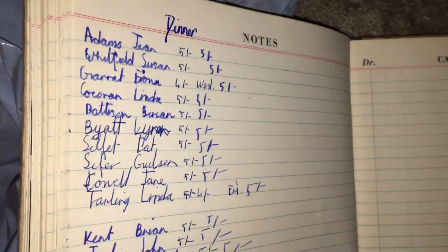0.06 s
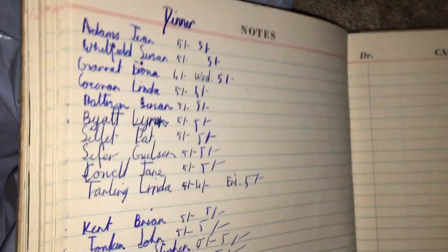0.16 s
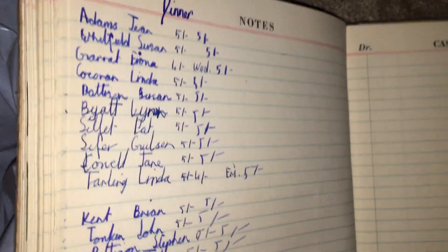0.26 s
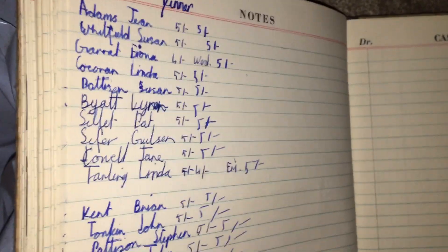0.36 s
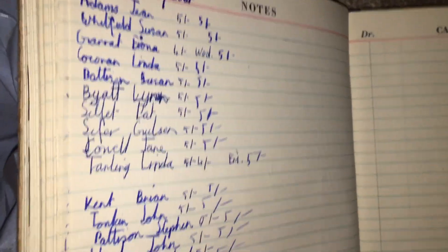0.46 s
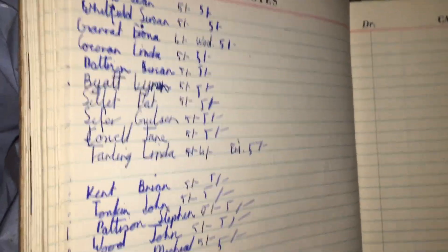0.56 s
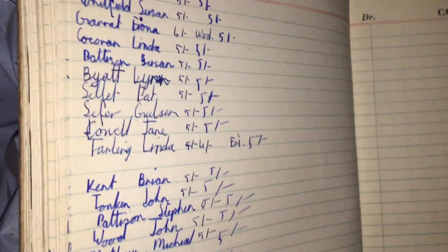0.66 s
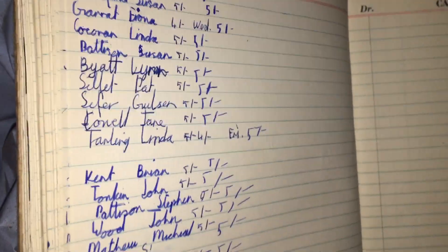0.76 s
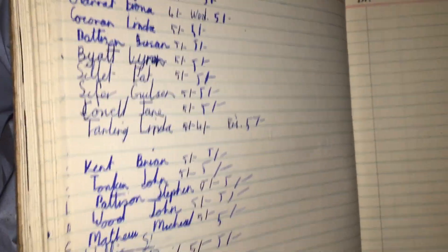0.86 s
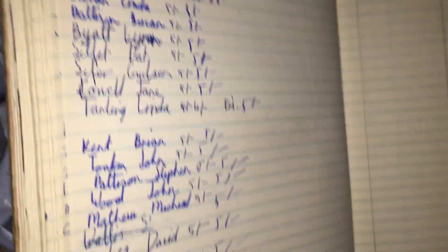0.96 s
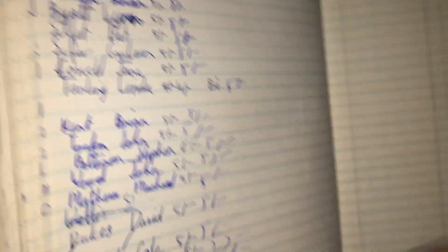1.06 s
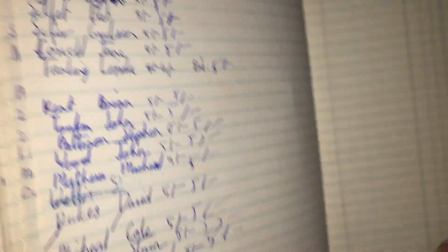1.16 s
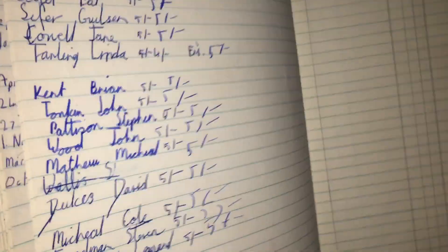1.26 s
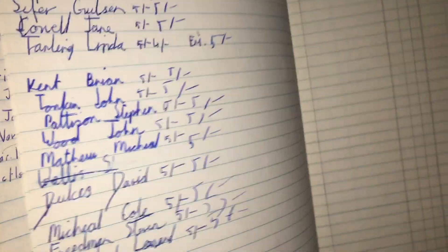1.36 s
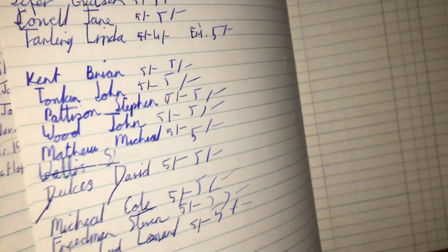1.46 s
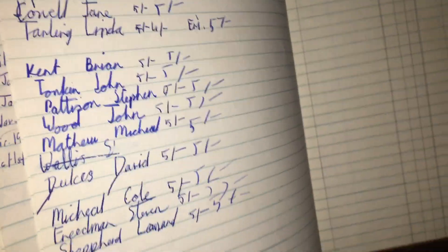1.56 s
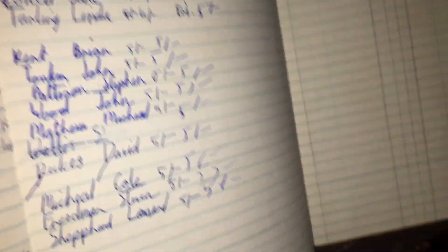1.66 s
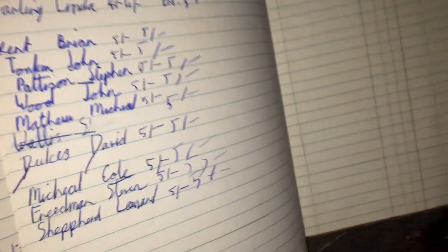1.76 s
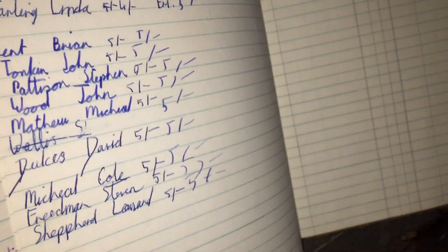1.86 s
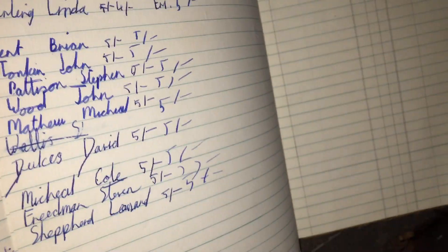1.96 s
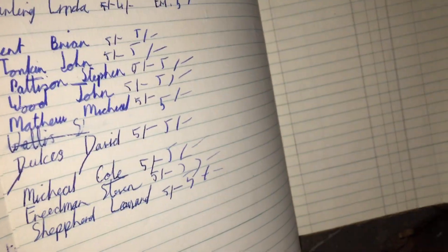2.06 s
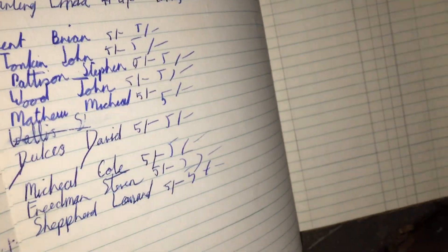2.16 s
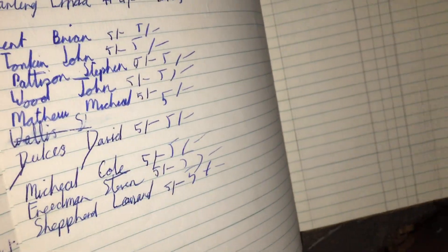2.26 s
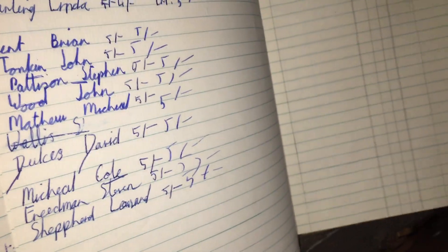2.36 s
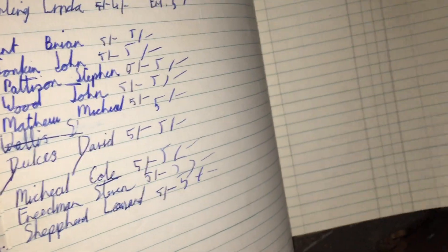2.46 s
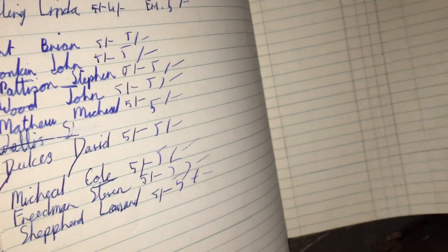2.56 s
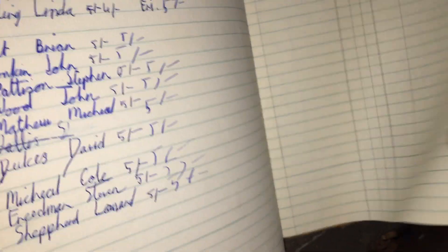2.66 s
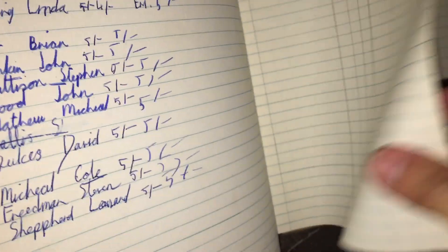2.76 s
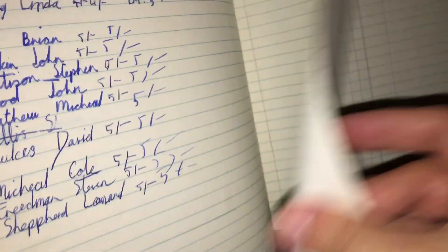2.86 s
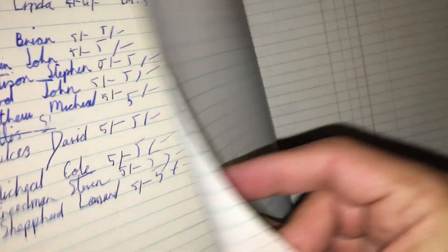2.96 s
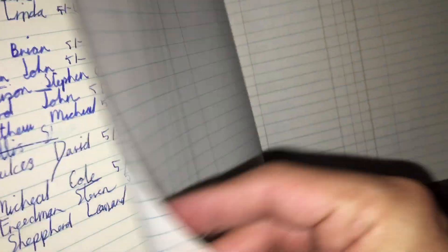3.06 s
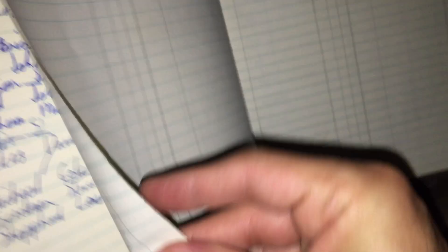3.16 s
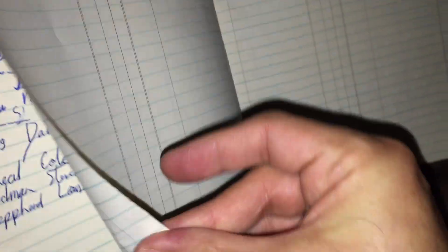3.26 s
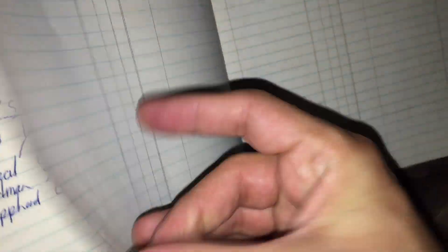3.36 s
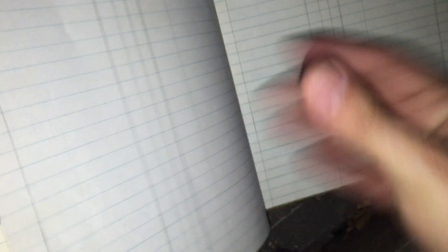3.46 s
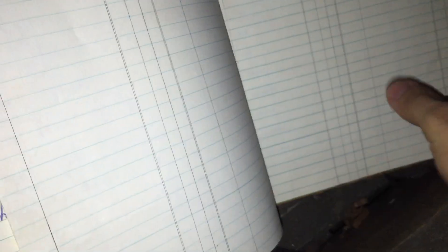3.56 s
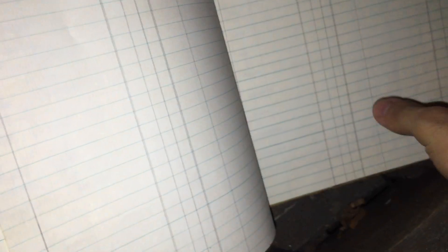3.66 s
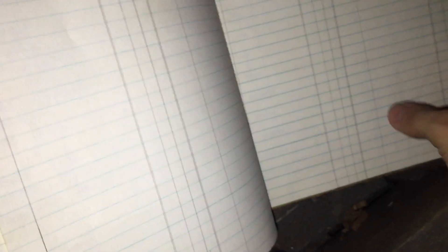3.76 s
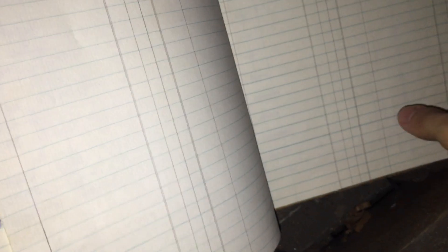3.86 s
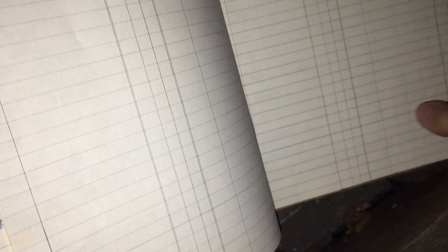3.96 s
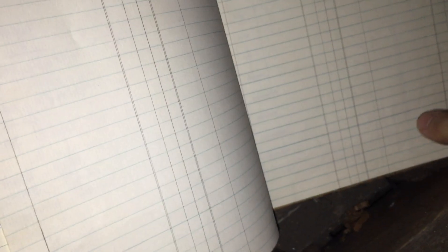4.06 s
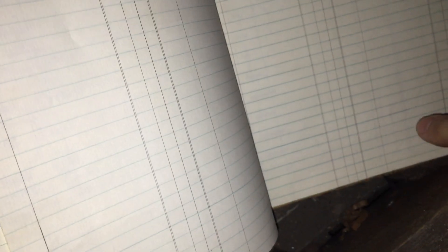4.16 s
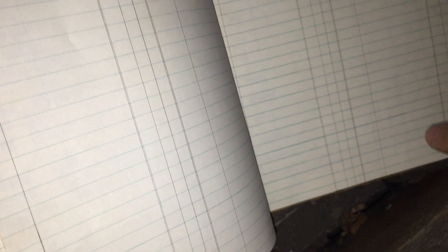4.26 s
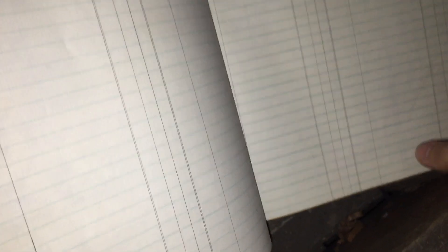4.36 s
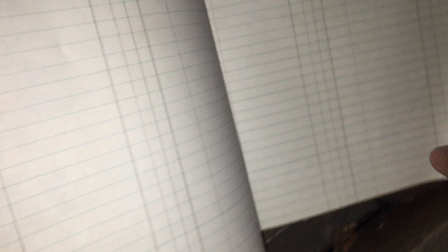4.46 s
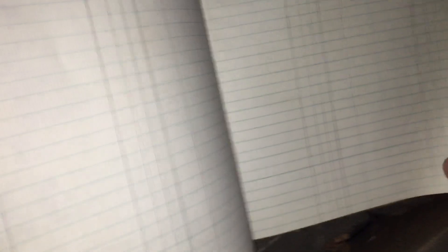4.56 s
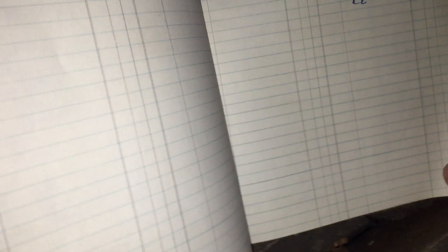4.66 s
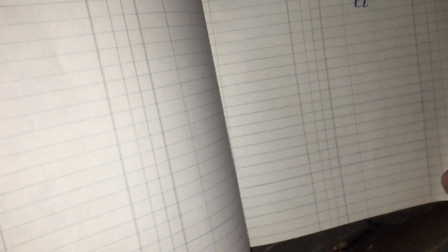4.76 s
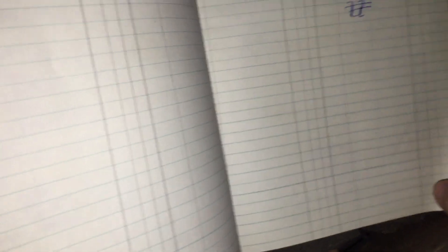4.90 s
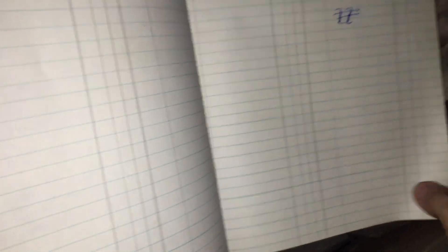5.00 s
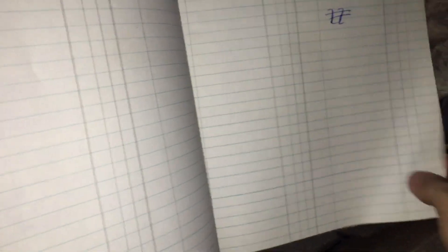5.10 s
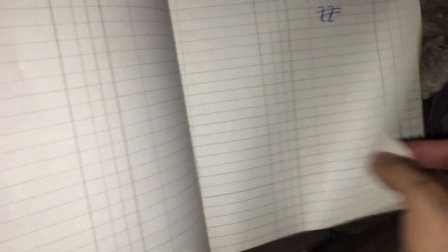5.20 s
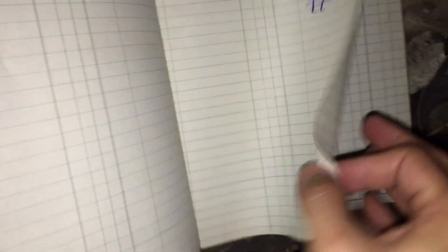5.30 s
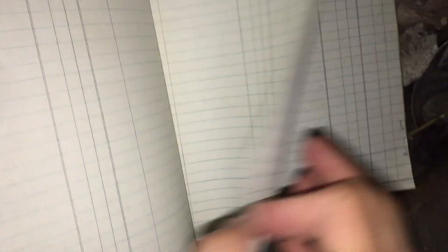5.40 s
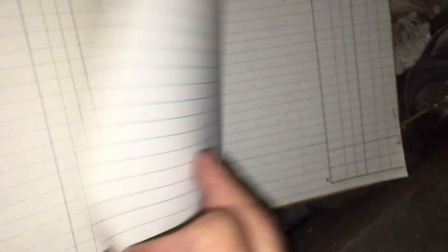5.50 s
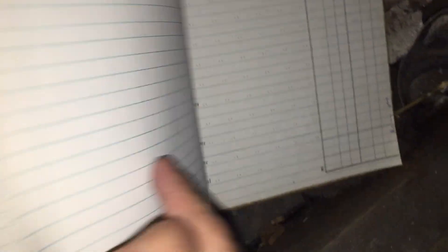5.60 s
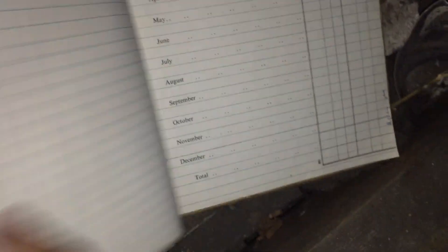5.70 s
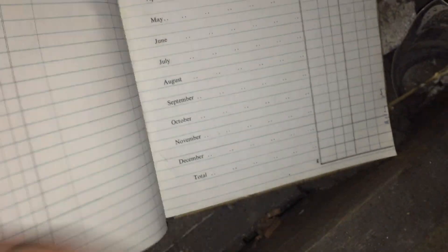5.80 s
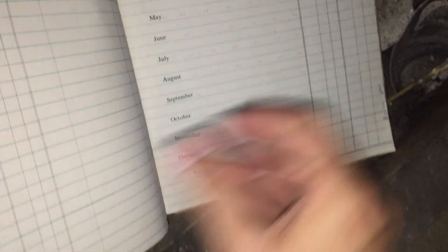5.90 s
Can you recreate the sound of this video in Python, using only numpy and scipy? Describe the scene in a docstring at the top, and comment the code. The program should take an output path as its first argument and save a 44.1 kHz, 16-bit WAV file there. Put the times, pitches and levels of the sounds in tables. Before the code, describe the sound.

A quiet indoor room, dry and close, with a very faint steady hiss and an uneven low rumble from the hand holding the microphone. From 0 to 2 s there is little else: soft dull bumps around 0.4, 1.1 and 1.4 s and barely audible paper ticks. At about 2.04 s a crisp crackle and scrape, a low thump at 2.17, then a raspy fingertip swipe from 2.3 to 2.55 s. A bump and paper flick at 2.7 s lead into a fuller page turn, bending and rustling from 3.0 to 3.5 s, ending in a small snap. Then near stillness with tiny ticks until a sharp bright crack at 4.54 s. Light touches follow; a second turn rustles from 5.2 to 5.6 s with a snap at 5.35. The loudest burst, hard bright crackling, comes at 5.8 to 5.85 s and fades quickly.

```python
"""Leafing through a thick diary

A quiet room, a hand-held microphone close to a thick diary: a hand flicks through its dry pages.
Sliding, bending and scraping paper is random fibre slips ringing resonances; creases snap as short
ringing bursts, taut sheets crack as single swings, and soft bumps are low decaying cycles.
The grip on the recorder rumbles as lumpy low noise over faint steady hiss, with a short room tail."""
import sys
import numpy as np
from scipy import signal
from scipy.fft import rfft, irfft
from scipy.io import wavfile

SR = 44100
rng = np.random.default_rng(int(sys.argv[2]) if len(sys.argv) > 2 else 0)


def int16_out(signal):
    """Quantize to a 16-bit WAV file."""
    q = np.round(np.clip(np.atleast_2d(signal).T, -1, 1) * 32767)
    wavfile.write(sys.argv[1], SR, q.astype(np.int16))


def amplitude_ratio(level_db):
    """Convert a level in decibels to the matching linear amplitude (field) ratio."""
    exponent = np.asarray(level_db, float) / 20
    return 10 ** exponent


N = 261851   # length in samples

# steady hiss at the microphone, spectrum shape: f/Hz, relative level/dB
HISS_SPECTRUM = [(180, -67.5), (300, -2.5), (842, -8), (2320, -14), (4910, -17), (5610, -18), (15000, -23),
                 (16000, -54.5)]
HISS_DB = -72.5   # rms
# low rumble of the holding hand, spectrum shape: f/Hz, relative level/dB
RUMBLE_SPECTRUM = [(15, -49), (25, -24), (46, 4.5), (70, 4.5), (146, 0.5), (260, -11.5), (340, -24.5),
                   (570, -120)]
# tension of the holding hand: t/s, level/dB
GRIP_TENSION = [(0.0, -62), (0.12, -51), (0.2, -54.5), (0.38, -50), (0.51, -56.5), (0.71, -60), (1.39, -56),
                (1.58, -55), (1.95, -52.5), (2.21, -55), (2.38, -57.5), (3.32, -61.5), (3.43, -65.5),
                (3.66, -66.5), (3.96, -64), (4.16, -61.5), (5.24, -58), (5.81, -57.5), (5.93, -54)]
RUMBLE_DB, BODY_REST_DB = 0.5, -20.5   # rumble and resting book, over the grip
# the block of pages shifts under the hands: start t/s, rise/s, fall/s, level/dB
BLOCK_SHIFTS = [(0.7, 0.051, 0.038, -66), (0.99, 0.028, 0.21, -65.5), (1.4, 0.13, 0.028, -58),
                (1.74, 0.036, 0.035, -59), (2.03, 0.017, 0.26, -73), (2.712, 0.006, 0.035, -52),
                (3.06, 0.081, 0.095, -56.5), (5.24, 0.11, 0.082, -47.5), (5.76, 0.081, 0.15, -55)]
RUMBLE_SHIFT_DB = -8.5   # rumble that a shift of the block passes to the hand

# resonances of the book and of each paper layer: f/Hz, width/Hz, level/dB
BODY_MODES = [(236, 288, 1), (334, 82, 7.5), (370, 1000, -11.5)]
FLEX_MODES = [(737, 235, 1.5), (1210, 460, 0.5), (1560, 1160, -5.5), (2130, 910, -2.5)]
RUB_MODES = [(2580, 1810, -1.4), (3470, 1150, 1.3), (4130, 1000, -0.09)]
NAIL_MODES = [(5900, 2150, -15)]
EDGE_MODES = [(9500, 7100, -6.5), (14170, 3400, -2.5), (15100, 3400, -2)]
FLUTTER_DB = 2.4   # slow wavering of each resonance, rms

# soft bumps of hand and book: t/s, level/dB, pitch it settles to f/Hz
BUMPS = [(0.425, -41.5, 147), (1.065, -41.5, 262), (1.118, -43.5, 204), (1.365, -41.5, 140),
         (1.423, -46.5, 303), (1.467, -44, 260), (2.038, -39, 185), (2.169, -33, 166), (2.712, -32.5, 141),
         (3.928, -49.5, 104), (5.504, -43, 103)]
BUMP_CYCLES = 6.5   # cycles of the settled pitch until 60 dB down
# the taut sheet cracks in a single swing: t/s, peak level/dB, f/Hz
SHEET_CRACKS = [(2.0415, -59, 2920), (3.4663, -23.5, 2900), (4.5398, -14.5, 9100), (5.3466, -18.5, 4000),
                (5.8475, -5, 6100)]
CRACK_WIDTH = 0.48   # bandwidth of each of two passes, as a share of the pitch
# crease snaps: t/s, level/dB, ring f/Hz, treble tick relative level/dB
CREASE_SNAPS = [(1.0666, -49, 880, -23), (1.174, -61, 1200, -15), (1.1176, -51, 730, -6),
                (1.23, -53.5, 1710, -12), (1.426, -48.5, 10900, 9), (1.5193, -41.5, 8700, 7),
                (1.792, -52, 5900, 11.5), (1.9762, -45, 4020, -22), (2.0088, -35, 5400, 3),
                (2.0137, -39, 5700, -7), (2.0395, -24, 880, 1), (2.0418, -22.5, 3100, -36),
                (2.0445, -22, 3000, -17), (2.0577, -27, 794, -19.5), (2.1642, -36, 2530, -16),
                (2.173, -44, 2740, -11), (2.566, -34, 5040, -3), (2.7133, -33, 3060, -19),
                (2.7196, -27.5, 790, -17), (2.722, -32, 493, -20), (3.0397, -38, 8700, -10),
                (3.2748, -33.5, 2010, -7), (3.4647, -28.5, 4350, -21), (3.467, -31.5, 1620, -14),
                (3.467, -32, 2800, -15), (3.812, -51, 6100, -6), (4.032, -42, 1380, -11),
                (4.504, -40.5, 9050, -9.5), (4.515, -37, 9350, -12), (4.528, -30, 4340, -3),
                (4.535, -28, 6100, 2), (4.5375, -27.5, 4200, -8), (4.5443, -25.5, 4220, 5),
                (4.553, -26.5, 5840, -13), (4.5715, -37, 4250, 2), (4.581, -46, 4100, -5),
                (4.9453, -37.5, 11800, 0), (5.0971, -35.5, 4100, -19), (5.117, -43, 5860, -11),
                (5.208, -34, 2700, -19), (5.2427, -27.5, 790, -15), (5.258, -35, 880, -21),
                (5.285, -35, 740, -27), (5.317, -37.5, 1090, -15), (5.3489, -18, 3110, -18),
                (5.35, -23.5, 1510, -16), (5.366, -33, 770, -15), (5.403, -40, 3500, -9),
                (5.507, -34.5, 660, -8), (5.5544, -32.5, 2580, -14), (5.612, -33.5, 5900, -1.5),
                (5.8004, -22.5, 2330, -17), (5.8062, -14.5, 2300, -20), (5.8351, -15.5, 2890, -20),
                (5.829, -24, 2680, -11), (5.847, -26, 1480, 9.5)]
SNAP_T60_S = 0.0047   # of the faster part of the burst

# a fingertip swipes across the open page, slows down, rests and drags on:
# t/s, level/dB, lowest rasp f/Hz
SWIPE_PATH = [(2.285, -68, 3050), (2.33, -44.5, 3000), (2.39, -38, 2890), (2.445, -39.5, 2840),
              (2.49, -45, 2700), (2.565, -51, 2750), (2.585, -66, 2720), (2.85, -60, 3300),
              (2.88, -49.5, 3420), (2.95, -52, 3350), (2.97, -83, 3400)]
# rasp bands: multiple of the lowest f, width/Hz, level/dB, slope as it wears on/(dB per s)
RASP_BANDS = [(1.0, 950, 0, -5.0), (1.47, 1200, -2, -20.0), (2.0, 1900, 3, -70.0)]

# fingers and sheets slide: start t/s, rise/s, fall/s, level/dB, brightness/dB (weighted per layer)
SLIDES = [(0.989, 0.053, 0.1, -72.5, -5), (1.14, 0.021, 0.14, -79.5, -4), (1.33, 0.026, 0.066, -74, -6.5),
          (1.42, .002, 0.048, -66.5, 3), (1.465, 0.06, 0.015, -60, 1), (1.753, 0.04, 0.0073, -59, -4.5),
          (1.88, .002, 0.018, -66, -0.5), (1.928, 0.0087, 0.19, -68, -1),
          (2.008, 0.012, 0.038, -51.5, -1.5), (2.038, 0.012, 0.01, -41.5, 1),
          (2.085, 0.012, 0.049, -56, -2), (2.163, 0.0027, 0.014, -49.5, -3.5),
          (2.194, 0.025, 0.016, -44.5, -2), (2.24, 0.018, 0.0092, -55, -6.5),
          (2.284, 0.061, 0.039, -45.5, 3), (2.327, 0.097, 0.076, -41, -2),
          (2.47, 0.048, 0.099, -47.5, -1.5), (2.58, 0.077, 0.073, -52, -1), (2.714, .004, .105, -43, -2),
          (2.74, .065, .015, -48, -1), (2.853, .008, .1, -45, -1.5), (2.87, .07, .017, -46, -2),
          (3.012, 0.032, 0.0018, -60.5, 1), (3.042, 0.0042, 0.078, -42, -1),
          (3.08, 0.054, 0.026, -44.5, -6.5), (3.162, 0.013, 0.092, -43.5, 5.5),
          (3.2, 0.026, 0.063, -47.5, 0.5), (3.312, 0.01, 0.11, -47, 2.5), (3.389, 0.052, 0.06, -48, 0.5),
          (3.459, 0.023, 0.03, -44, -0.5), (3.543, 0.0016, 0.077, -66.5, -2.5),
          (3.794, 0.0074, 0.046, -66, -1), (3.865, 0.0088, 0.035, -71, 5), (4.027, 0.004, 0.012, -53.5, -4),
          (4.04, .004, 0.047, -68, -0.5), (4.298, 0.004, 0.087, -67, 4), (4.438, 0.0033, 0.031, -71.5, 7),
          (4.496, 0.033, .02, -55.5, 0.5), (4.53, 0.009, 0.044, -49.5, 4), (4.763, .01, 0.024, -71, 5),
          (4.945, 0.0016, 0.03, -63, 3), (5.086, 0.01, 0.047, -56.5, -2.5),
          (5.183, 0.02, 0.014, -47.5, 0.5), (5.222, 0.012, 0.024, -41, -4.5),
          (5.257, 0.095, 0.035, -49.5, -2.5), (5.402, 0.013, 0.061, -47, 3), (5.44, 0.054, 0.015, -50, 2),
          (5.51, 0.04, .003, -65, -5), (5.554, 0.0018, 0.01, -57, -3), (5.568, 0.031, 0.044, -49.5, -0.5),
          (5.64, 0.13, 0.19, -66.5, -4.5), (5.758, 0.014, 0.15, -53.5, -6.5),
          (5.799, 0.052, 0.042, -37.5, 2), (5.903, 0.0032, 0.018, -47.5, 3.5)]
# flexing, rubbing, nail and edge in a slide: weight of the brightness, level/dB
SLIDE_LAYERS = [(1.6, -10.5), (-0.51, -2.5), (0.63, -4), (1.01, -2.74)]
FLEX_FOLLOWS = 0.13   # share of the brightness that the flexing obeys
# a sheet bends and flexes: start t/s, rise/s, fall/s, level/dB
BENDS = [(0.99, 0.061, .06, -70.5), (1.93, 0.024, 0.11, -64.5), (2.197, 0.04, 0.017, -62),
         (5.44, 0.013, 0.044, -52.5), (1.465, 0.062, 0.014, -61.5), (1.755, 0.0026, 0.037, -62),
         (2.037, 0.013, 0.01, -40.5), (2.165, 0.013, 0.0058, -51.5), (2.714, 0.0012, 0.036, -42),
         (2.8, 0.11, 0.05, -55.5), (3.09, 0.012, 0.097, -37.5), (3.15, 0.0038, 0.04, -37.5),
         (3.272, 0.0089, 0.016, -47), (3.46, 0.008, 0.0059, -35), (3.545, 0.0043, 0.16, -62.5),
         (3.61, 0.023, 0.012, -56.5), (4.03, 0.0018, 0.062, -63), (4.533, 0.0093, 0.016, -38),
         (5.19, 0.02, 0.0045, -52.5), (5.225, 0.035, 0.024, -53.5), (5.29, 0.065, 0.045, -44.5),
         (5.404, 0.022, 0.019, -45.5), (5.51, 0.0017, 0.014, -48.5), (5.555, 0.0011, 0.016, -49),
         (5.58, 0.041, 0.022, -50.5), (5.8, 0.021, 0.051, -36), (5.872, 0.012, 0.042, -46),
         (5.758, 0.05, .004, -47.5), (4.09, 0.26, 0.9, -80)]
# a nail catches the paper: start t/s, rise/s, fall/s, level/dB
NAIL_SCRAPES = [(2.03, 0.021, 0.0087, -39.5), (3.315, 0.0084, 0.16, -48.5), (4.301, 0.0024, 0.012, -54.5),
                (4.325, 0.018, 0.038, -65.5), (4.763, 0.0045, .006, -60), (4.779, 0.0076, 0.0052, -58),
                (5.404, 0.013, 0.029, -44.5)]
RISE_DB, FALL_DB = 14.5, 15   # how far under its top a stroke starts and stops
STROKE_FADE_S = 0.0067        # time constant beyond start and stop
# a light touch sticks and slips: extra unevenness per dB under this level
STUTTER_DB, STUTTER_UNDER_DB = 0.27, -58.5

# the facing page mirrors the sound: lag, its wandering share, level
ECHO_S, ECHO_SWING, ECHO_DB = 0.00068, 0.16, -11
ROOM_T60_S, ROOM_DB = 0.12, -21.5
# dips of the microphone port: f/Hz, width/Hz, level/dB
MIC_DIPS = [(4976, 340, -5), (10470, 990, -6)]
CUTOFF_HZ = 16200   # 45 dB down from here up


def rms_one(x):
    """Scale to unit rms."""
    return x / np.sqrt(np.mean(x ** 2) + 1e-20)


def drift(rate):
    """Slow random wander of rms 1: noise through two equal low-pass poles at rate Hz."""
    r = np.exp(-2 * np.pi * rate / SR)
    noise = rng.standard_normal(N + SR)   # the first second only settles the filter
    return rms_one(signal.lfilter([1], [1, -2 * r, r * r], noise)[SR:])


def resonance(x, hz, width_hz):
    """Two-pole peak of gain 1."""
    r = np.exp(-np.pi * width_hz / SR)
    gain = (1 - r * r) / 2
    return signal.lfilter([gain, 0, -gain], [1, -2 * r * np.cos(2 * np.pi * hz / SR), r * r], x)


def coloured(spectrum):
    """Steady noise of a given spectrum, rms 1."""
    hz, level_db = np.transpose(spectrum)
    grid = np.maximum(np.arange(N // 2 + 1) * SR / N, 1)
    shape = amplitude_ratio(np.interp(np.log(grid), np.log(hz), level_db))
    return rms_one(irfft(rfft(rng.standard_normal(N)) * shape, N))


def friction(modes, per_s, spread_db, flutter_db, edge=0.34):
    """Paper fibres catch and slip at random and ring the resonances, each with its own flutter."""
    sizes = amplitude_ratio(spread_db * np.minimum(rng.exponential(1, N), 5)) * rng.choice([-1, 1], N)
    slips = sizes * (rng.random(N) < per_s / SR)
    total = np.zeros(N)
    for k, (hz, width, db) in enumerate(modes):
        ring = resonance(resonance(slips, hz, width), hz, 2 * width)
        total += (-1) ** k * amplitude_ratio(db + flutter_db * drift(18.7)) * ring
    # a small sheet radiates no bass and damps its top
    no_bass = signal.butter(4, edge * modes[0][0], "high", fs=SR, output="sos")
    damped_top = signal.butter(2, min(0.89 * modes[-1][0], 0.45 * SR), fs=SR, output="sos")
    return rms_one(signal.sosfilt(np.vstack([no_bass, damped_top]), total))


def stroke_shape(start, rise, fall):
    """A rounded top between a start and a stop that take milliseconds; gives the span and its gain."""
    on = slice(int((start - 0.03) * SR), min(int((start + rise + fall + 0.03) * SR), N))
    t = np.arange(on.start, on.stop) / SR - start - rise   # zero at the top
    db = -RISE_DB * np.clip(t / rise, -1, 0) ** 2 - FALL_DB * np.clip(t / fall, 0, 1) ** 2
    outside = np.maximum(np.maximum(-rise - t, t - fall), 0)
    return on, amplitude_ratio(db) * np.exp(-outside / STROKE_FADE_S)


def follow(rows):
    """Gain in time of the loudest stroke among rows of (start, rise, fall, dB)."""
    gain = np.zeros(N)
    for start, rise, fall, db in rows:
        on, shape = stroke_shape(start, rise, fall)
        gain[on] = np.maximum(gain[on], amplitude_ratio(db) * shape)
    return gain


def hiss():
    """Faint steady noise at the microphone."""
    return amplitude_ratio(HISS_DB) * coloured(HISS_SPECTRUM)


def room(x):
    """The quiet room answers with a short, dull diffuse tail."""
    t = np.arange(SR // 3) / SR
    tail = rng.standard_normal(len(t)) * amplitude_ratio(-60 * t / ROOM_T60_S) * (t > 0.004)
    tail = signal.lfilter([1], [1, -0.6], tail)
    return amplitude_ratio(ROOM_DB) * signal.fftconvolve(x, tail / np.linalg.norm(tail))[:N]


def grip():
    """Muscle tremor in the holding hand is lumpy low noise; the block of pages adds dull grains."""
    hold_db = np.interp(np.arange(N) / SR, *np.transpose(GRIP_TENSION))
    shifts = follow(BLOCK_SHIFTS)
    tremor = amplitude_ratio(1.5 * drift(2.77) + 2.6 * drift(16.5))
    rumble_gain = amplitude_ratio(hold_db + RUMBLE_DB) + amplitude_ratio(RUMBLE_SHIFT_DB) * shifts
    rumble = rumble_gain * tremor * coloured(RUMBLE_SPECTRUM)
    body_gain = (amplitude_ratio(hold_db + BODY_REST_DB) + shifts) * amplitude_ratio(FLUTTER_DB * drift(13.0))
    return rumble + body_gain * friction(BODY_MODES, 1500, 4.0, FLUTTER_DB)


def bumps():
    """A soft contact: a few low cycles that swell and die."""
    size = SR // 8
    out, t = np.zeros(N + size), np.arange(size) / SR
    for s, db, hz in BUMPS:
        swell = (1 - np.exp(-t * hz * 35.0)) * amplitude_ratio(-60 * t * hz / BUMP_CYCLES)
        # the pitch drops as the contact spreads
        cycles = hz * t * (1 + 0.69 * np.exp(-t * hz))
        out[round(s * SR):][:size] += amplitude_ratio(db) * swell / swell.max() * np.sin(2 * np.pi * cycles)
    return out[:N]


def cracks():
    """A taut sheet cracks: one sharp impulse through a wide resonance."""
    out, click = np.zeros(N + 256), np.eye(1, 256)[0]
    for s, db, hz in SHEET_CRACKS:
        width_hz = CRACK_WIDTH * hz
        swing = resonance(resonance(click, hz, width_hz), hz, width_hz)
        out[round(s * SR):][:len(click)] += amplitude_ratio(db) * swing / abs(swing).max()
    return out[:N]


def snaps():
    """A crease gives way: a brief burst rings at its own pitch, ticks in the treble, thumps the sheet."""
    size = SR // 32
    out, t = np.zeros(N + size), np.arange(size) / SR
    treble = signal.butter(2, 6500, "high", fs=SR, output="sos")
    # a fast decay over a weaker one four times as long
    decay = amplitude_ratio(-60 * t / SNAP_T60_S) + amplitude_ratio(-6.5 - 15 * t / SNAP_T60_S)
    envelope = decay * (1 - np.exp(-t / 0.0001))
    sheet = BODY_MODES + FLEX_MODES + RUB_MODES + NAIL_MODES
    for s, db, hz, tick_db in CREASE_SNAPS:
        burst = rng.standard_normal(size) * envelope
        ring = resonance(resonance(burst, hz, 180 + 0.082 * hz), hz, 1.1 * hz)
        tick = signal.sosfilt(treble, burst)
        thump = sum(amplitude_ratio(g) * resonance(burst, f, w) for f, w, g in sheet)
        parts = [(ring, -1.5), (tick, tick_db), (thump, -4)]
        snap = sum(amplitude_ratio(part_db) * v / abs(v).max() for v, part_db in parts)
        out[round(s * SR):][:size] += amplitude_ratio(db) * snap
    return out[:N]


def swipe():
    """Dense slips under the fingertip pass through resonances that glide with its speed."""
    t = np.arange(N) / SR
    s, db, hz = np.transpose(SWIPE_PATH)
    turn = 2j * np.pi * np.cumsum(np.interp(t, s, hz)) / SR
    sizes = amplitude_ratio(2.6 * rng.exponential(1, N)) * rng.choice([-1, 1], N)
    slips = sizes * (rng.random(N) < 12000 / SR)
    out = np.zeros(N)
    for times, width_hz, level_db, slope_db in RASP_BANDS:
        # shift the gliding band down to zero, filter it there, shift it back
        narrow = signal.butter(3, width_hz / 2, fs=SR, output="sos")
        centred = signal.sosfilt(narrow, slips * np.exp(-times * turn))
        band = np.real(centred * np.exp(times * turn))
        wear_db = slope_db * np.clip(t - s[1], 0, 0.25)
        out += amplitude_ratio(level_db + FLUTTER_DB * drift(26.0) + wear_db) * rms_one(band)
    return out * amplitude_ratio(np.interp(t, s, db, -200, -200))


def strokes():
    """Slides drive four friction layers by their brightness; bends add flexing, nails add scraping."""
    slides = np.array(SLIDES)
    gains = []
    for (weight, db), share in zip(SLIDE_LAYERS, [FLEX_FOLLOWS, 1, 1, 1]):
        level_db = slides[:, 3] + db + weight * share * slides[:, 4]
        gains.append(follow(np.c_[slides[:, :3], level_db]))
    gains[0] = np.hypot(gains[0], follow(BENDS))
    gains[2] = np.hypot(gains[2], follow(NAIL_SCRAPES))
    light_db = np.clip(STUTTER_UNDER_DB - 20 * np.log10(np.sum(gains, axis=0) + 1e-9), 0, 20)
    # the fingertip presses unevenly, more so in a light touch
    pressure = amplitude_ratio((0.8 + STUTTER_DB * light_db) * drift(60))
    # now and then a fibre tears free
    crinkles = (rng.random(N) < 110 / SR) * rng.exponential(1, N) * (0.6 + light_db / 6)
    pressure = pressure * (1 + signal.lfilter([1], [1, -np.exp(-1 / (0.00014 * SR))], crinkles))
    layers = [friction(FLEX_MODES, 3200, 2.9, FLUTTER_DB, edge=0.6),
              friction(RUB_MODES, 13000, 2.7, FLUTTER_DB, edge=0.72),
              friction(NAIL_MODES, 16000, 2.4, FLUTTER_DB),
              friction(EDGE_MODES, 15000, 1.7, FLUTTER_DB)]
    return pressure * np.sum(np.multiply(gains, layers), axis=0)


def facing_page(x):
    """A close echo whose lag wanders as hand and sheet move, so that narrow bands of colour shift."""
    lag = ECHO_S * SR * np.exp(ECHO_SWING * drift(2.2))
    return x + amplitude_ratio(ECHO_DB) * np.interp(np.arange(N) - lag, np.arange(N), x)


def scene():
    """Paper close by in the room, rumble and hiss at the microphone."""
    paper = facing_page(strokes() + swipe() + snaps()) + cracks() + bumps()
    return (paper + room(paper) + grip() + hiss())[None]


def roll_off(x):
    """The treble ends steeply here."""
    return signal.sosfilt(signal.butter(12, 16820, fs=SR, output="sos"), x)


def record(dry):
    """The hand-held microphone: its port has two narrow dips, and deep bass and top are cut."""
    for hz, width_hz, db in MIC_DIPS:
        dry = dry - (1 - amplitude_ratio(db)) * resonance(dry, hz, width_hz)
    dry = signal.sosfilt(signal.butter(4, 36, "high", fs=SR, output="sos"), dry)
    mix = signal.sosfilt(signal.cheby2(12, 45, CUTOFF_HZ, fs=SR, output="sos"), dry)
    return roll_off(mix)


dry = scene()
out = record(dry)
int16_out(out)
```